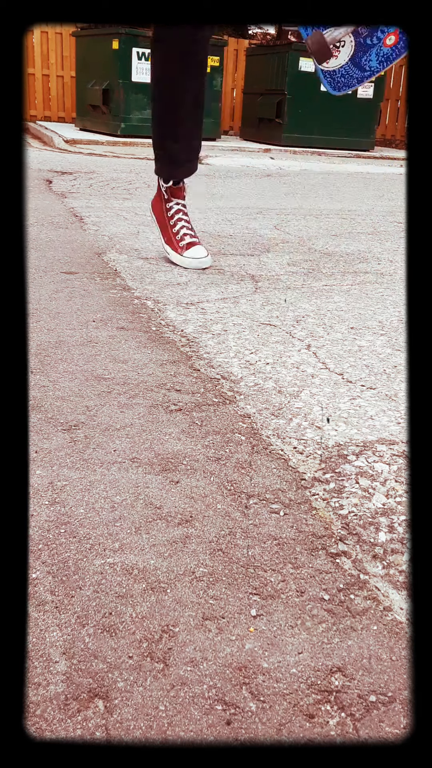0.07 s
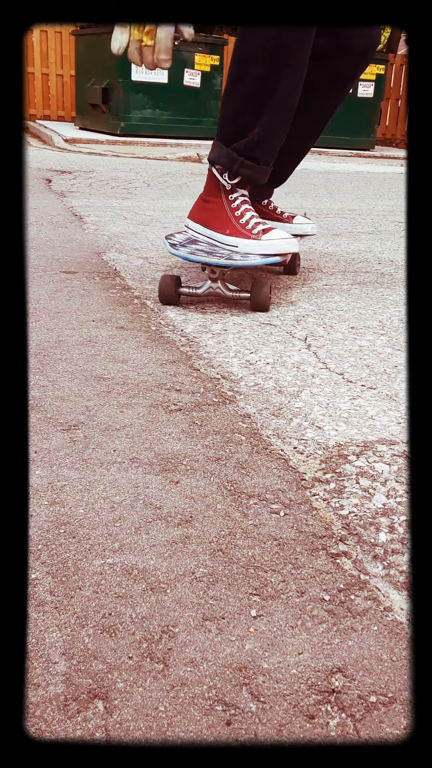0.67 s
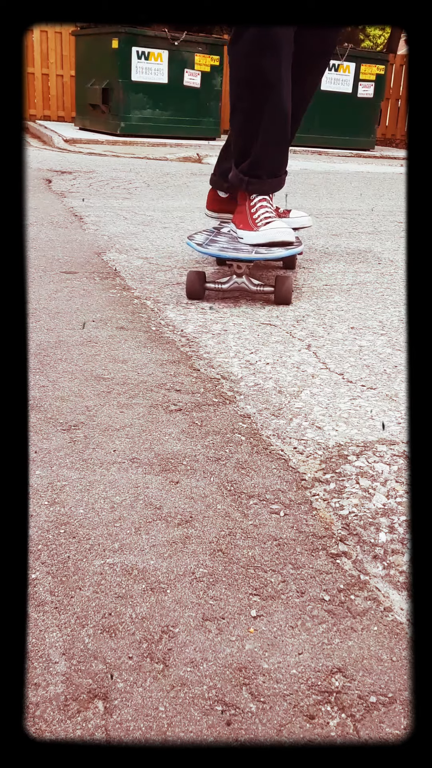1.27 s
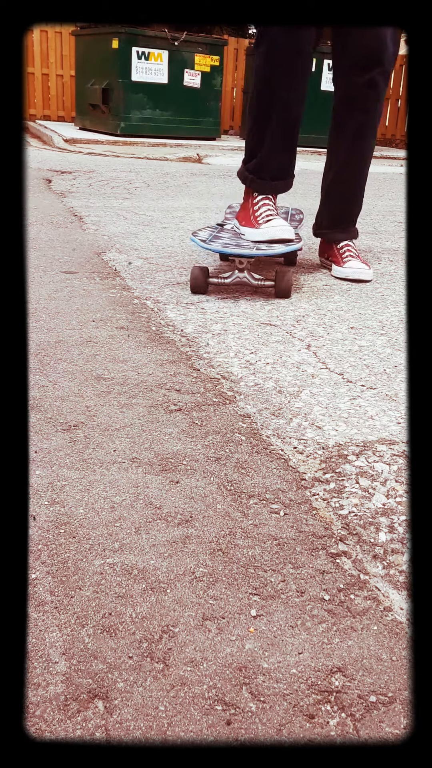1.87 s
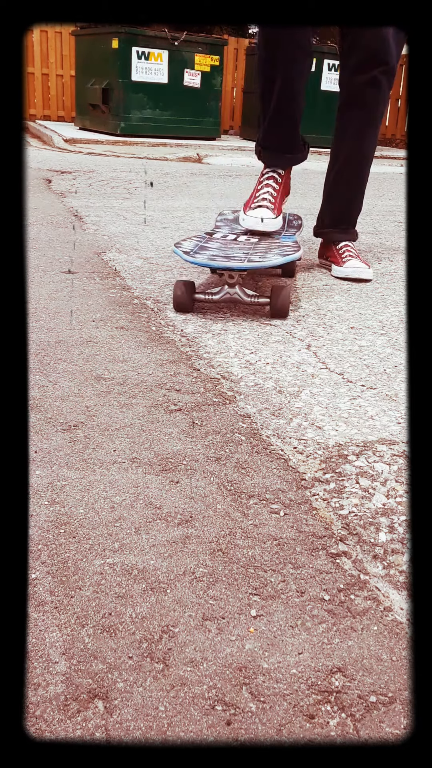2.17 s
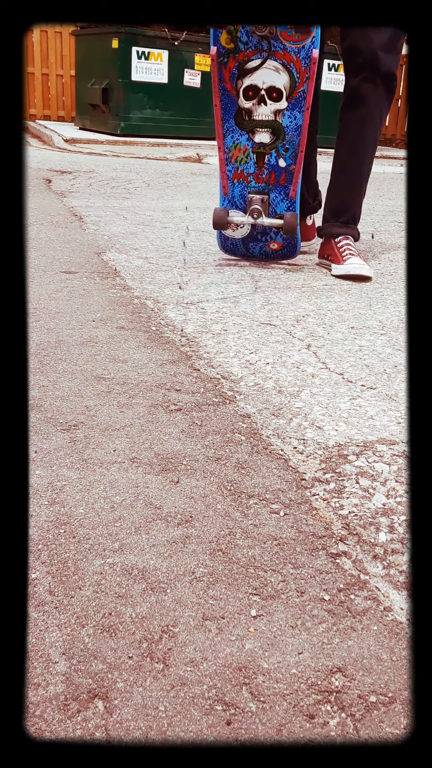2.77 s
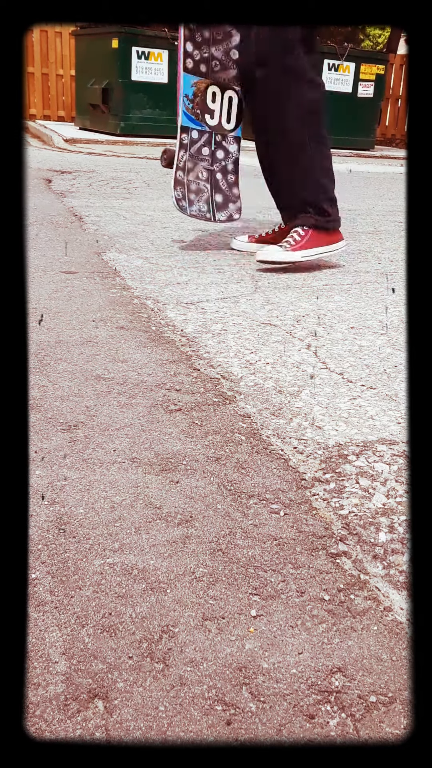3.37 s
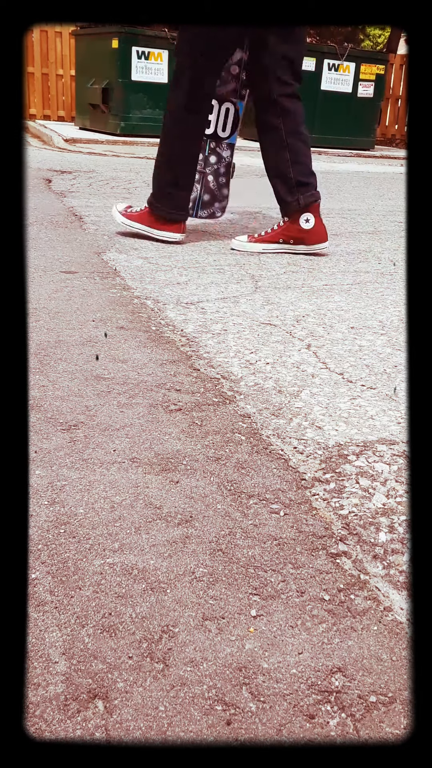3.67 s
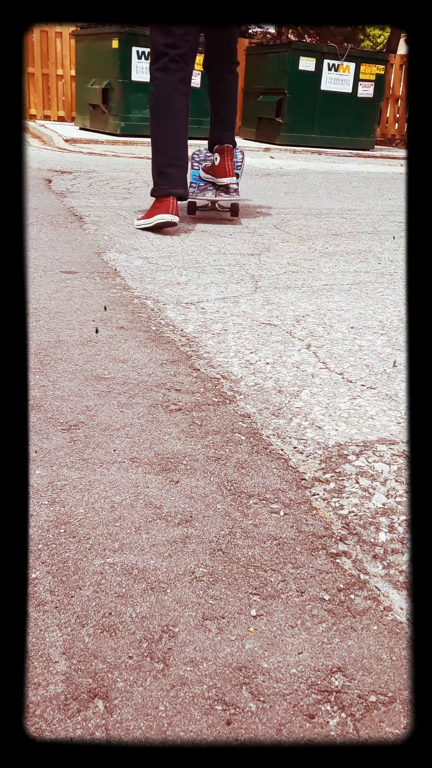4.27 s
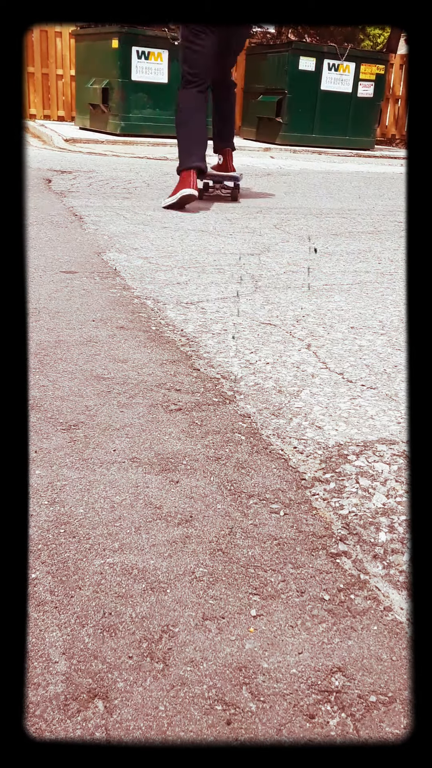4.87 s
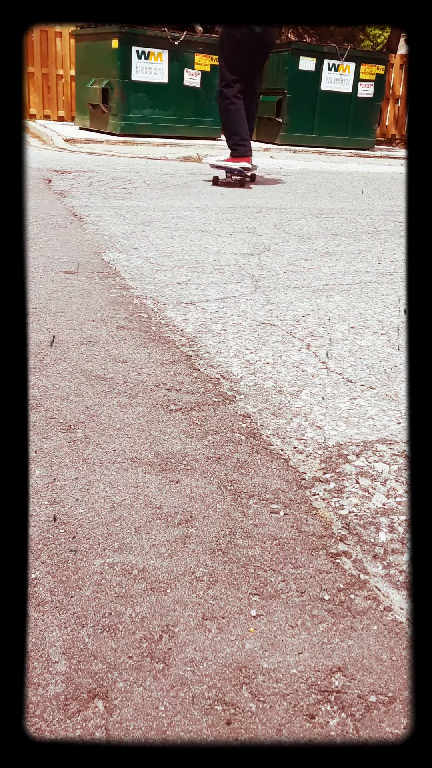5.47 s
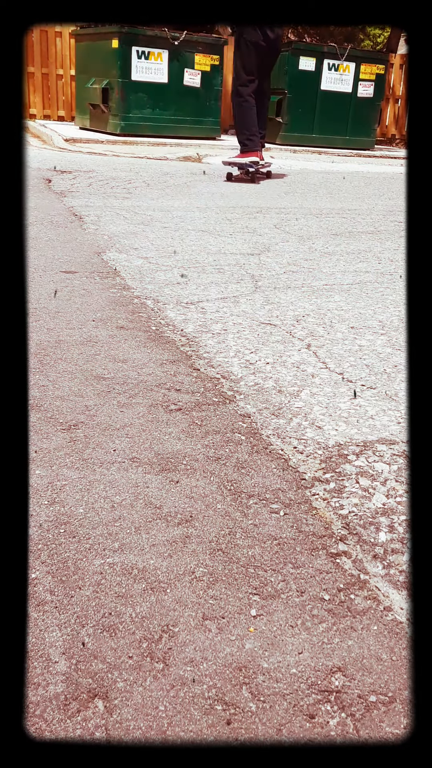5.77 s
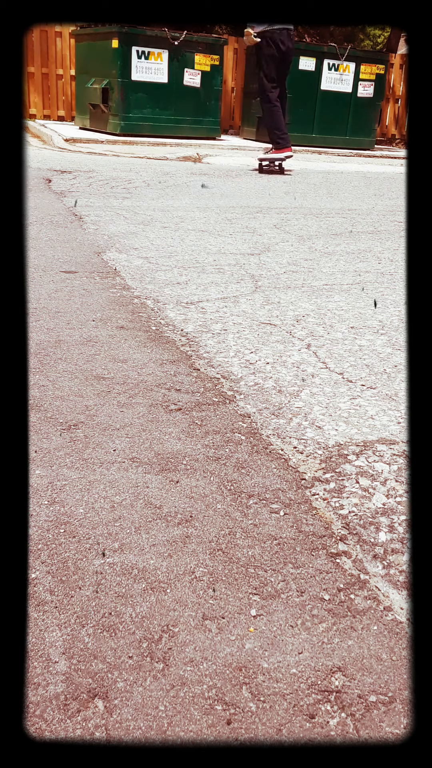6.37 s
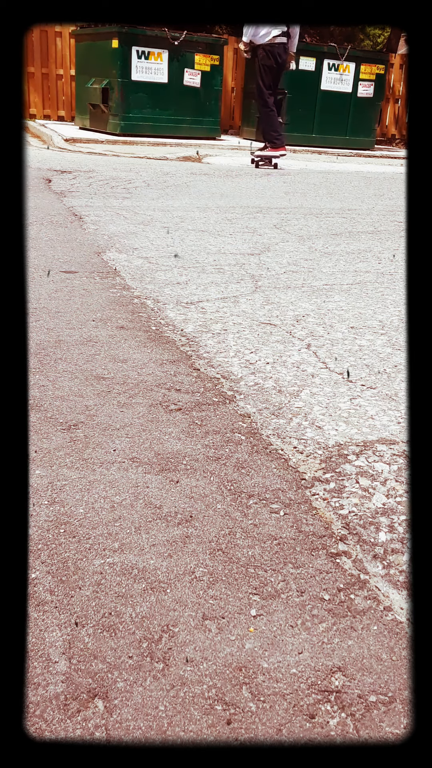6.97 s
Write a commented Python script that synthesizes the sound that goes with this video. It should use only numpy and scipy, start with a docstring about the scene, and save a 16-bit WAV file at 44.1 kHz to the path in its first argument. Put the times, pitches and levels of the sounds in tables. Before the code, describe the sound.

In an outdoor lot, a wooden skateboard lands nearby with a quick run of clacks. Its hard wheels roll a little, then the tail snaps against the asphalt and the board rattles. Following a short lull, it slaps down again, a rubber sole scuffs, and the wheels roll off with a gritty rumble and small knocks. Far birds twitter faintly over a low town hum.

```python
"""Wheels rumble briefly and a skateboard clatters down on the rough asphalt of a back lot.
It is ridden a little, popped up by its tail, thrown down and ridden away. Blows ring the wooden deck
and rattle the trucks; hard wheels roll with light knocks and gritty ticks; rubber soles scuff.
Faint birds and town hum lie behind and sink for a moment after each clatter.
Two closely spaced microphone ports listen."""
import sys
import numpy as np
from scipy import signal
from scipy.fft import rfft, irfft, next_fast_len
from scipy.io import wavfile

SR = 44100
rng = np.random.default_rng(int(sys.argv[2]) if len(sys.argv) > 2 else 0)


def inscribe(sig):
    """Save sig as 16-bit PCM at rate SR to the path in sys.argv[1].

    A 1-D sig is mono; a 2-D sig holds one channel per row.
    Samples are clipped to [-1, 1] before scaling.
    """
    pcm = np.round(np.clip(np.atleast_2d(sig).T, -1, 1) * 32767)
    wavfile.write(sys.argv[1], SR, pcm.astype(np.int16))


N = 313992
TIME_S = np.arange(N) / SR
FFT_SIZE, BLOW_SIZE = next_fast_len(N + SR, real=True), 16384
ROLLING_COLUMN, GRIT_COLUMN = 1, 2   # of WHEEL_RUNS

# Table levels are relative.
# blows on the board: t/s, force/dB, ring/Hz, thump/dB, crack/dB, rattle/dB, rattle t60/s
BOARD_BLOWS = [ (0.3854, 2, 290, 3.5, -10, 5, 0.059), (0.4022, -1, 800, 5, -6, 24, 0.057),
               (0.42, -1.5, 845, 5, -14, -2.5, 0.053), (0.4263, -1, 696, 1, 3, 8, .054),
               (0.4565, -8.5, 467, -6, 7, 13, 0.033), (0.461, -5, 477, 1, -2, 5, 0.044),
               (0.482, -9.5, 498, 6, 3, .5, 0.053), (0.5382, -17, 500, -1, -2, 2, 0.12),
               (1.1258, -33, 370, 2, -21, -1, 0.044), (1.1282, -18.5, 692, -14.5, -19, -15, 0.033),
               (2.6386, -5.5, 1260, -21, 9, 4, 0.11), (2.65, -11.5, 930, 10.5, 5, 18, 0.13),
               (2.6767, -5, 776, -5, 8, 1, 0.074), (2.6886, -9, 433, -11, -11, -1, 0.25),
               (2.718, -13.5, 724, -1, 0, 9, 0.1), (2.758, -22, 680, -7, -7, 1, 0.056),
               (4.1281, -7, 785, 2.5, 6.5, 4, .14), (4.2637, -4, 745, -2.5, -7, 7, 0.061),
               (4.277, -13, 690, 7.5, 6, 6, 0.088), (4.334, -19.5, 730, -7, -18, 17, 0.067),
               (4.3587, -5, 605, 4.5, 2.5, -1, 0.084), (4.3624, -14.5, 222, 6.5, 5, 7, 0.11),
               (4.431, -14, 570, 12, 9, 15, 0.12), (4.442, -9.5, 584, 4, 0, 4, 0.16)]
# board response to a blow: f/Hz, level/dB
BOARD_RESPONSE = [(30, -40), (70, 10.5), (140, 26), (350, 31), (900, 29), (1400, 21.5), (2100, 20),
                  (2650, 9), (3500, 6.5), (4500, -5), (6000, -6.5), (8300, -5.5), (10300, -10),
                  (15500, -6.5)]
# modes of deck and trucks: f/Hz, width/Hz, level/dB
DECK_MODES = [(162, 23, 2.5), (315, 8.2, 3.5), (387, 15, 1.5), (454, 6.6, 4), (508, 18, 3), (704.4, 10, 1),
              (920, 28, -0.5), (980, 22, 1), (1003.5, 17, 5.5), (1160, 13, 5), (1432, 21, 6),
              (1663, 67, 4.5), (2190, 53, 0.5), (2990, 65, 2.5), (3400, 120, 0)]
# light knocks, most of them while the board rolls: t/s, level/dB, wheel ring/dB
LIGHT_KNOCKS = [(0.331, -10, -3), (1.94, -17.5, 3), (1.994, -18.5, 17.5), (2.017, -15, 6.5),
                (2.033, -15.5, 10), (2.066, -17, 14), (2.12, -20.5, 17.5), (2.144, -19.5, 10.5),
                (2.236, -18, 11.5), (2.306, -11.5, -13), (5.391, -13, -9), (5.446, -14, -6),
                (5.908, -15, -8), (5.938, -10, -8), (6.185, -13.5, -11), (6.464, -16, -9)]
# three runs (drop, ride to the pop, throw and ride away), each: t/s, rolling/dB, grit/dB
WHEEL_RUNS = [
    [(0.0, -39, -55.5), (0.36, -36, -57), (0.44, -33, -43.5), (0.57, -48, -60), (0.7, -53.5, -71.5),
     (1.5, -66, -84)],
    [(1.8, -58, -74), (2.03, -45, -57), (2.32, -35.5, -57), (2.4, -48, -76), (2.62, -42.5, -74),
     (2.75, -41, -62), (2.9, -67, -82)],
    [(3.8, -67, -73), (3.95, -63, -76), (4.12, -60, -71), (4.16, -30, -71), (4.36, -33.5, -47),
     (4.5, -41, -65), (4.8, -40.5, -63), (5.0, -50, -65), (5.42, -38.5, -60), (5.72, -43.5, -64.5),
     (6.1, -37.5, -56), (6.5, -43.5, -71.5), (6.76, -41.5, -67), (7.12, -45, -71)],
]
# rolling, low band: f/Hz, level/dB
RUMBLE_SPECTRUM = [(25, -22), (55, -26.5), (100, -1.5), (160, -2), (260, -1), (420, -16), (900, -49)]
# rolling, middle band: f/Hz, level/dB
ROAR_SPECTRUM = [(150, -13.5), (330, -2), (700, 1), (1000, -4.5), (1500, -13.5), (3000, -53)]
# rolling, upper band: f/Hz, level/dB
CHATTER_SPECTRUM = [(600, -26), (1200, 2), (1600, 2.5), (2000, -2.5), (2500, -6), (3200, -12), (4500, -28),
                    (7000, -36), (16000, -46)]
# loose grit: f/Hz, level/dB
GRIT_SPECTRUM = [(1500, 0.5), (3200, 16.5), (6000, 3.5), (8300, 10), (10300, 1.5), (15500, 7)]
# sharp gritty ticks: t/s, level/dB
SHARP_TICKS = [(0.0987, -37), (1.921, -44), (2.064, -35.5), (2.201, -35.5), (3.904, -42), (4.826, -41.5),
               (5.0954, -39.5), (5.8006, -35.5), (5.945, -35), (6.1847, -36.5), (6.232, -38.5)]
# soles scraping: t/s, rise/s, length/s, level/dB
SOLE_SCUFFS = [(1.124, .002, 0.0078, -39.5), (2.303, 0.0082, 0.044, -30), (4.343, 0.0042, 0.0097, -24.5),
               (4.652, 0.0109, 0.021, -30), (6.564, 0.011, 0.034, -45)]
# rubber on grit: f/Hz, level/dB
SOLE_SPECTRUM = [(500, -34), (1500, 8.5), (3200, 5), (5500, -3.5), (8300, -7.5), (10500, -9.5), (15500, -3)]
# loose truck knocking: t/s, level/dB
TRUCK_KNOCKS = [(3.202, -39.5), (3.338, -46), (3.352, -46.5)]
# truck modes: f/Hz, level/dB, t60/s
TRUCK_MODES = [(760, -5, 0.14), (1350, 0.5, 0.12), (1434, -5, .11), (1657, -10, 0.15), (2110, -26, .08)]
# twittering bird's phrases: start/s, end/s
TWITTER_PHRASES = [(1.17, 1.5), (1.79, 1.88), (2.18, 2.05), (2.5, 2.5), (3.34, 3.6), (3.85, 4.2),
                   (4.5, 4.65), (6.55, 6.9), (6.92, 7.07)]
# whistling bird's phrases: start/s, end/s
WHISTLE_PHRASES = [(1.85, 2.4), (2.79, 4.1), (3.55, 3.75)]
# far traffic: f/Hz, level/dB
TRAFFIC_SPECTRUM = [(25, -31), (60, -13), (91, -2.5), (140, -0.5), (267, -5.5), (509, -12), (919, -12.5),
                    (1800, -21), (2850, -31), (4620, -38.5), (5500, -44), (8400, -44), (10600, -55),
                    (15500, -59)]
# background dips: fall start/s, return start/s, depth/dB
BACKGROUND_LULLS = [(0.47, 1.543, 13), (2.68, 3.722, 11), (4.45, 5.033, 4)]
# echoes off fence and bins: delay/s, level/dB
LOT_ECHOES = [(.034, -35), (.058, -30), (.085, -31.5)]
# right port against left: f/Hz, gain/dB, lag/ms, scatter/dB
RIGHT_PORT_RESPONSE = [(100, 0.1, 0.087, -16), (405, -.5, 0.028, -9), (750, 1.5, 0.047, -9.5),
                       (1100, 4.5, 0.16, -3.5), (1500, 2, 0.18, -8), (1980, -1.5, 0.1, -32),
                       (2200, 6, 0.15, -6), (2350, -1, 0.2, 9.5), (3020, -6, 0.24, 13),
                       (4400, -14, 0.18, 28), (8300, -14.5, 0.254, 2), (15000, -18.5, 0.236, 7)]


def clacks():
    """Where the board lands decides which region of it rings and how much it thumps."""
    out, hz = np.zeros(N), bins_hz(BLOW_SIZE)
    board_db = at_hz(BOARD_RESPONSE, hz) + deck_db(hz)
    for s, force_db, ring_hz, thump_db, crack_db, rattle_db, t60_s in BOARD_BLOWS:
        ring_db = (5 - 0.51 * force_db) * resonance(hz, ring_hz, 0.3 * ring_hz)   # more on soft blows
        bass_db = thump_db / (1 + (hz / 290) ** 4)
        response_db = force_db + board_db + ring_db + bass_db
        add(out, s, blow(response_db, crack_db, rattle_db, t60_s, grit_db=6))
    return out


def blow(response_db, crack_db, rattle_db, rattle_t60_s, grit_db):
    """First touch cracks and rings the metal trucks; then loose parts chatter and grit is crushed."""
    hz, rattle = bins_hz(BLOW_SIZE), from_db(rattle_db)
    hard_db = crack_db / (1 + (1400 / hz) ** 4) - 5 / (1 + (6000 / hz) ** 4)
    metal_db = 5 * resonance(hz, centre_hz=2050, width_hz=510)
    crush_db = grit_db / (1 + (3200 / hz) ** 5)
    touch = colour(signal.unit_impulse(BLOW_SIZE), response_db + hard_db + metal_db)
    chatter = colour(burst(rattle_t60_s, BLOW_SIZE, spiky_db=2), response_db + crush_db)
    return (touch + rattle * chatter) / np.sqrt(1 + rattle ** 2)


def deck_db(hz):
    """Lift that the deck's modes give to whatever shakes it."""
    return sum(db * resonance(hz, mode_hz, width_hz) for mode_hz, width_hz, db in DECK_MODES)


def light_knocks():
    """Light blows with little bass ring wheel and deck."""
    out, hz = np.zeros(N), bins_hz(BLOW_SIZE)
    bass_cut_db = 8 / (1 + (hz / 550) ** 4)
    ring_db = 6 * resonance(hz, centre_hz=730, width_hz=260)
    board_db = at_hz(BOARD_RESPONSE, hz) + deck_db(hz) - bass_cut_db + ring_db
    for s, db, wheel_db in LIGHT_KNOCKS:
        response_db = db - 5.5 + board_db + wheel_db * resonance(hz, centre_hz=1510, width_hz=880)
        add(out, s, blow(response_db, crack_db=-14, rattle_db=1, rattle_t60_s=0.12, grit_db=2.5))
    return out


def rolling():
    """Countless stones shake wheels and deck, a few larger ones knock; loose grit crackles on top."""
    hz = bins_hz(FFT_SIZE)
    unevenness = drift(per_s=55)   # one road moves roar, chatter and grit together
    shaking = grains(per_s=3500, spread_db=2.5) * from_db(3.2 * unevenness)
    shaking += 0.48 * grains(per_s=45, spread_db=1)
    roar = unit_rms(colour(shaking, at_hz(ROAR_SPECTRUM, hz) + 0.11 * deck_db(hz)))
    jolts = grains(per_s=2500, spread_db=2.5)
    rumble = unit_rms(colour(jolts, at_hz(RUMBLE_SPECTRUM, hz) + 0.22 * deck_db(hz)))
    ticks = grains(per_s=4000, spread_db=2.5) * from_db(1.7 * unevenness)
    chatter = unit_rms(colour(ticks, at_hz(CHATTER_SPECTRUM, hz)))
    crackle = grains(per_s=17000, spread_db=5) * from_db(2.8 * unevenness + 2.2 * drift(per_s=330))
    bearing_whine_db = 4.5 * resonance(hz, centre_hz=3550, width_hz=130)
    grit = unit_rms(colour(crackle, at_hz(GRIT_SPECTRUM, hz) + bearing_whine_db))
    body = rumble * from_db(-5.5) + roar * from_db(-0.33) + chatter * from_db(-8)
    return body * from_db(wheels_db(ROLLING_COLUMN)) + grit * from_db(wheels_db(GRIT_COLUMN) + 9)


def wheels_db(column, still_db=-110):
    """One wheel level over time; silent between runs."""
    runs = map(np.array, WHEEL_RUNS)
    levels_db = [np.interp(TIME_S, run[:, 0], run[:, column], still_db, still_db) for run in runs]
    return np.max(levels_db, axis=0)


def gritty_ticks(small_per_s=4.5):
    """Sharp gritty ticks at set times; small random ones follow the grit level."""
    out, hz = np.zeros(N), bins_hz(FFT_SIZE)
    for s, db in SHARP_TICKS:
        add(out, s, from_db(db + 11) * burst(t60_s=0.022, size=4096, spiky_db=15))
    onsets = rng.random(N) < small_per_s / SR
    small_db = wheels_db(GRIT_COLUMN) + 29.5 + 2.5 * rng.standard_normal(N)
    crunch = burst(t60_s=0.024, size=4096, spiky_db=16)
    out += signal.fftconvolve(onsets * from_db(small_db), crunch)[:N]
    return colour(out, at_hz(GRIT_SPECTRUM, hz) + 7 * resonance(hz, centre_hz=2840, width_hz=170))


def scuffs(release_s=0.0056):
    """Rubber drags over grit: the rasp swells, eases and stops."""
    pressure = np.zeros(N)
    for s, rise_s, length_s, db in SOLE_SCUFFS:
        knots_s = [0, rise_s, max(length_s, rise_s), length_s + release_s]
        pressure += from_db(db) * np.interp(TIME_S - s, knots_s, [0.0035, 1, 0.45, 0])
    rasp = colour(grains(per_s=5200, spread_db=5), at_hz(SOLE_SPECTRUM, bins_hz(FFT_SIZE)))
    return pressure * unit_rms(rasp)


def truck_knocks():
    """A loose metal truck rings briefly while the board is carried."""
    out, t = np.zeros(N), TIME_S[:BLOW_SIZE]
    ring = sum(from_db(db) * decay(t, t60_s) * np.sin(2 * np.pi * hz * t)
               for hz, db, t60_s in TRUCK_MODES)
    for s, db in TRUCK_KNOCKS:
        add(out, s, from_db(db) * ring)
    return out


def birds():
    """One far bird twitters in wide sweeps; another whistles thinly, its notes running together."""
    twitter = bird(TWITTER_PHRASES, hz=4160, sweep=0.31, per_s=15, gain_db=-52.5)
    whistle = bird(WHISTLE_PHRASES, hz=7700, sweep=0.026, per_s=36, gain_db=-64.5)
    return twitter + whistle


def bird(phrases, hz, sweep, per_s, gain_db, note_s=0.044):
    """Up to ten arched, trembling notes a phrase, blurred by distance."""
    out, t = np.zeros(N), TIME_S[:int(note_s * SR)]
    arch = 0.45 - 12 * (t / note_s - 0.4) ** 2
    for start_s, end_s in phrases:
        onsets_s = np.arange(start_s, end_s - note_s / 2, 1 / per_s)
        for s, (higher, louder_db) in zip(onsets_s, rng.standard_normal((10, 2))):
            tremble = np.interp(t * 350, np.arange(50), rng.standard_normal(50))
            pitch_hz = hz * 2 ** (sweep * (arch + 0.35 * higher + 0.2 * tremble))
            note = np.sin(2 * np.pi * np.cumsum(pitch_hz) / SR) * signal.windows.hann(len(t))
            add(out, s, from_db(gain_db + louder_db) * note)
    return 0.5 * out + 0.93 * signal.fftconvolve(out, burst(t60_s=0.36, size=BLOW_SIZE))[:N]


def town(level_db=-38):
    """Steady hum of far traffic."""
    hum = colour(rng.standard_normal(N), at_hz(TRAFFIC_SPECTRUM, bins_hz(FFT_SIZE)))
    return from_db(level_db) * unit_rms(hum)


def lulls(fall_s=0.26, return_s=0.2):
    """Background gain: falls, holds and returns at set times."""
    dip_db = np.zeros(N)
    for start_s, end_s, depth_db in BACKGROUND_LULLS:
        falling = (TIME_S - start_s) / fall_s
        returning = 1 - (TIME_S - end_s) / return_s
        dip_db += depth_db * np.clip(np.minimum(falling, returning), 0, 1)
    return from_db(-dip_db)


def lot(x, tail_db=-19.5, tail_t60_s=0.51, build_s=0.024, cutoff_hz=5000):
    """Fence and bins return a few blurred echoes and a thin, dull tail."""
    response = from_db(tail_db) * burst(tail_t60_s, SR) * np.minimum(TIME_S[:SR] / build_s, 1)
    for s, db in LOT_ECHOES:
        add(response, s, from_db(db) * burst(t60_s=0.02, size=4096))
    dull = signal.butter(1, cutoff_hz, fs=SR, output="sos")
    return signal.fftconvolve(x, signal.sosfilt(dull, response))[:N]


def ports(front, around):
    """The right port is shaded and hears later; much of its treble scatters round the housing."""
    hz = bins_hz(FFT_SIZE)
    gain_db, lag_ms, scatter_db = at_hz(RIGHT_PORT_RESPONSE, hz)
    scatter = from_db(scatter_db)
    delay = np.exp(-2j * np.pi * hz * lag_ms / 1000)
    # quarter-cycle detour: the paths add in power
    both = (rfft(front, FFT_SIZE) - 1j * scatter * rfft(around, FFT_SIZE)) / np.sqrt(1 + scatter ** 2)
    return np.array([front, irfft(both * from_db(gain_db) * delay)[:N]])


def grains(per_s, spread_db):
    """Clicks at random times, a few much larger than the rest."""
    sizes = from_db(spread_db * np.minimum(rng.exponential(1, N), 4)) * rng.choice([-1, 1], N)
    return unit_rms(sizes * (rng.random(N) < per_s / SR))


def burst(t60_s, size, spiky_db=0):
    """Dying noise of unit energy, smooth or spiky."""
    noise = rng.standard_normal(size) * from_db(spiky_db * rng.standard_normal(size))
    noise *= decay(np.arange(size) / SR, t60_s)
    return noise / np.linalg.norm(noise)


def drift(per_s):
    """Random wander, spread about 1."""
    return np.interp(TIME_S * per_s, np.arange(4000), rng.standard_normal(4000))


def decay(t, t60_s):
    """Exponential fall, 60 dB in t60_s."""
    return np.exp(-np.log(1000) * t / max(t60_s, 1e-3))


def resonance(hz, centre_hz, width_hz):
    """Bell curve of one mode, peak 1."""
    return 1 / (1 + (2 * (hz - centre_hz) / width_hz) ** 2)


def colour(x, curve_db):
    """Minimum-phase filter with the given gain curve."""
    size = 2 * (len(curve_db) - 1)
    cepstrum = irfft(np.log(from_db(curve_db)))
    cepstrum[1:size // 2] *= 2
    cepstrum[size // 2 + 1:] = 0
    return irfft(rfft(x, size) * np.exp(rfft(cepstrum)))[:len(x)]


def at_hz(table, hz):
    """Table columns interpolated over log frequency."""
    knots_hz, *columns = np.transpose(table)
    return np.squeeze([np.interp(np.log(hz), np.log(knots_hz), column) for column in columns])


def bins_hz(size):
    """FFT bin frequencies, at least 1 Hz."""
    return np.maximum(np.arange(size // 2 + 1) * SR / size, 1)


def from_db(db):
    """Decibels to gain."""
    return 10 ** (np.asarray(db) / 20)


def unit_rms(x):
    """Scale to unit power."""
    return x / np.sqrt(np.mean(x ** 2) + 1e-20)


def add(out, s, sound):
    """Mix a sound in at time s."""
    i = max(int(round(s * SR)), 0)
    out[i:i + len(sound)] += sound[:N - i]


def sound_field():
    """Board, rider and surroundings along one path."""
    skate = clacks() + light_knocks() + rolling() + gritty_ticks() + scuffs() + truck_knocks()
    return skate + lot(skate) + lulls() * (birds() + town())


def scene():
    """The lot at the two ports."""
    return ports(front=sound_field(), around=sound_field())


def record(dry):
    """Thin the deep bass, round the loudest peaks, cut the top."""
    low_hz, high_hz = 36, 15950
    thin = signal.sosfilt(signal.butter(3, low_hz, "high", fs=SR, output="sos"), dry)
    rounded = thin / (1 + thin ** 4) ** (1 / 4)
    return signal.sosfilt(signal.ellip(10, 0.1, 80, high_hz, fs=SR, output="sos"), rounded)


dry = scene()
out = record(dry)
inscribe(out)
```